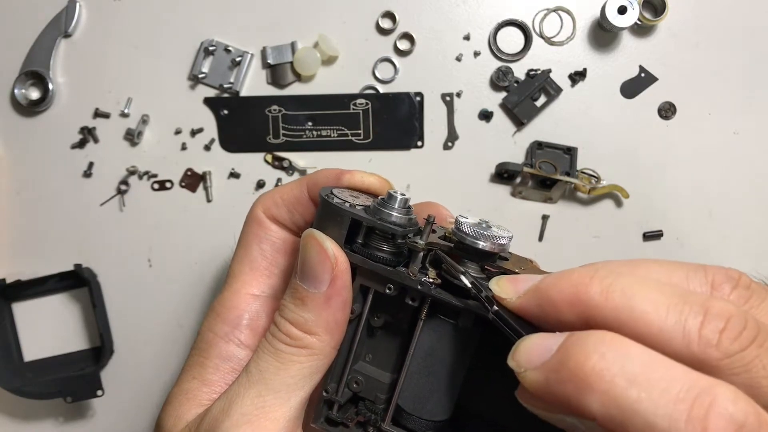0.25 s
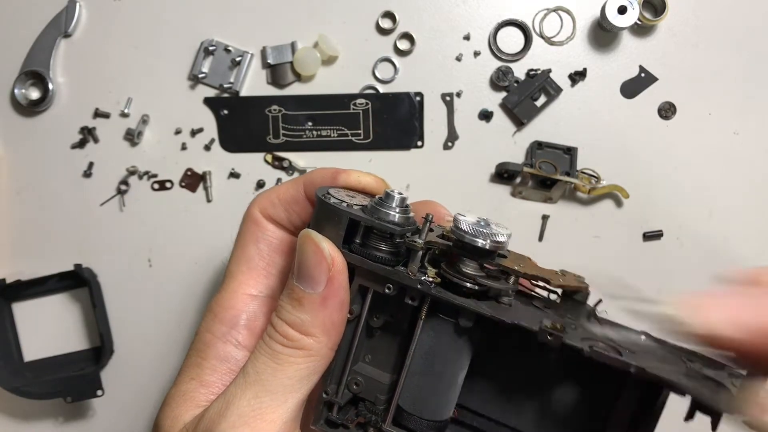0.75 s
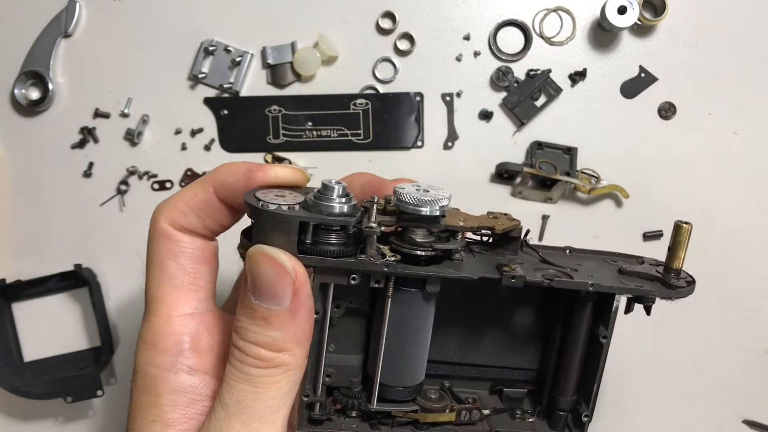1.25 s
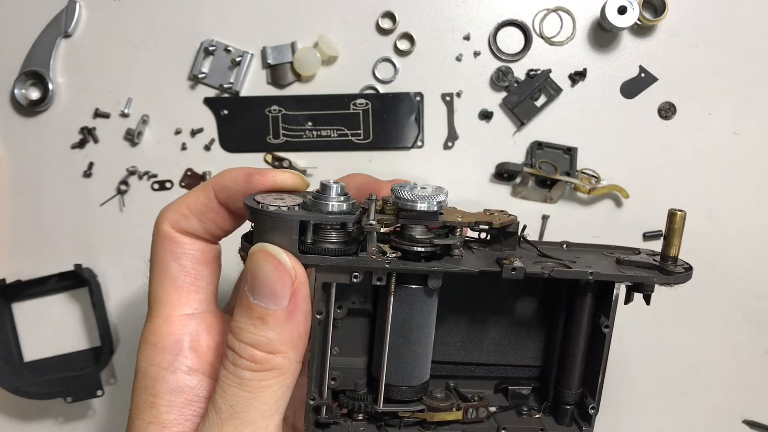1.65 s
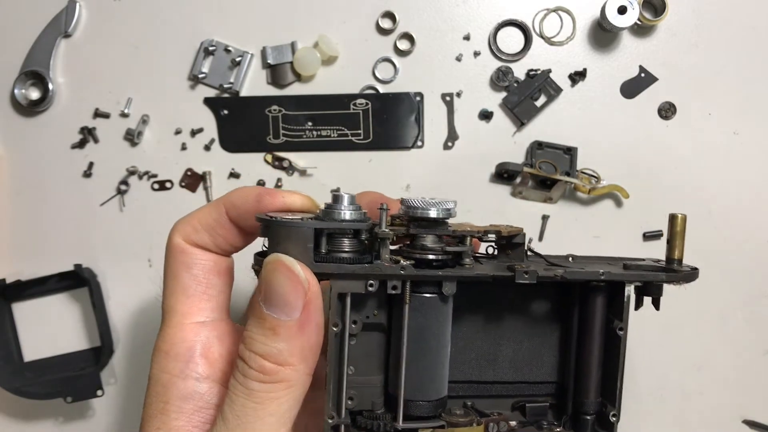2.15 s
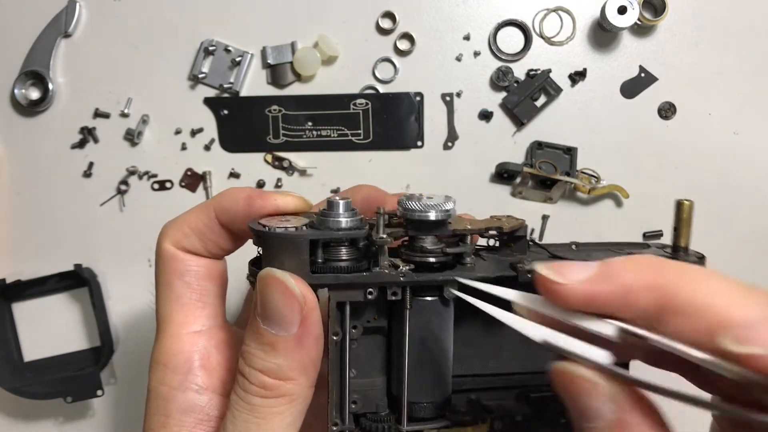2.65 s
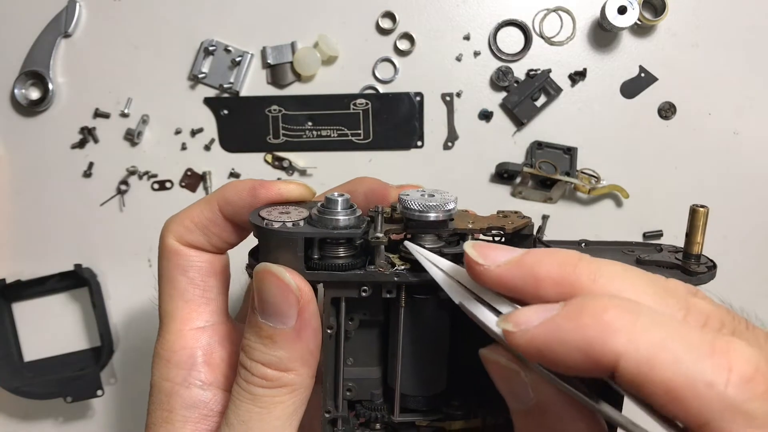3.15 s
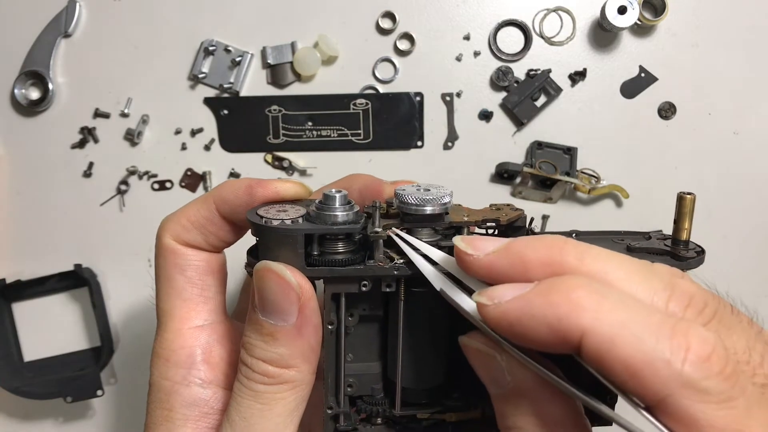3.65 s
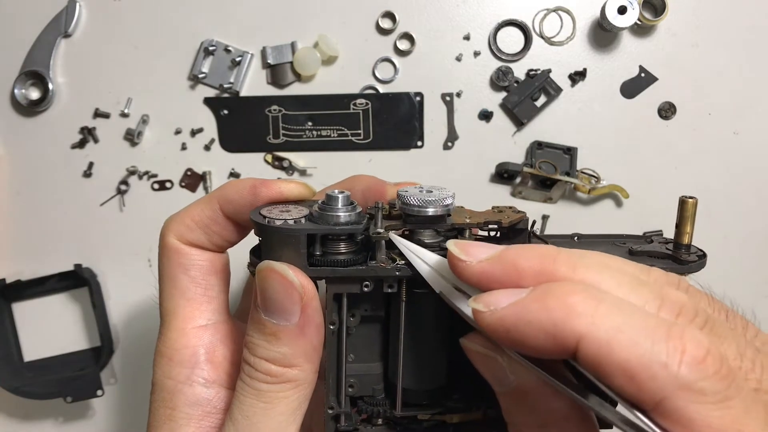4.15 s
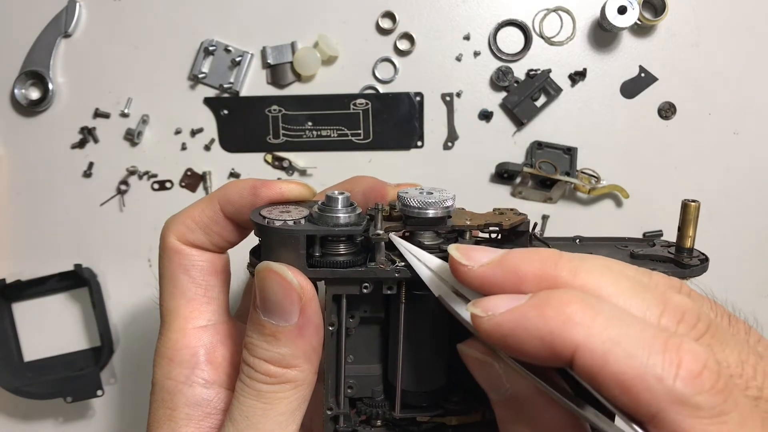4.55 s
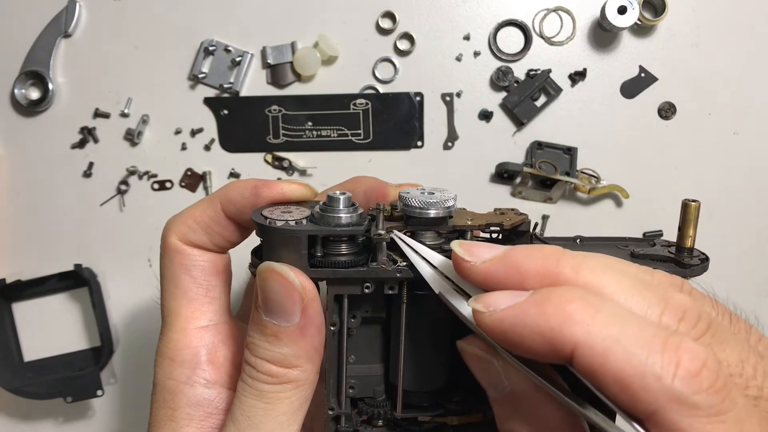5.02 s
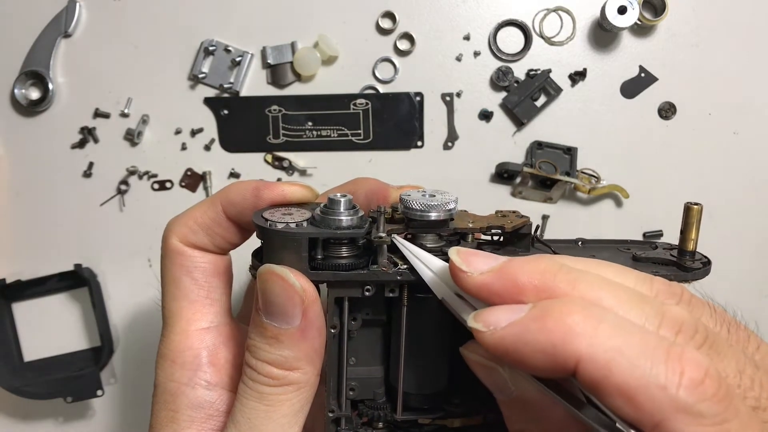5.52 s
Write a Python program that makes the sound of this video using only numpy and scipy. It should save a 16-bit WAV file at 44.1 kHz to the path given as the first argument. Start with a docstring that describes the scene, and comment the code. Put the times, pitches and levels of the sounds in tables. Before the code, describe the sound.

In a quiet room with a soft hiss and low drone, tweezers tick faintly and a fingertip brushes a camera body. The mechanism is turned once by hand: a short slide and dry squeak, a quick ratcheting rattle, then a sharp latch click. Sparse, delicate metal ticks and scrapes from the tweezers follow. The sound is close, with slight room ring.

```python
"""Close work on an opened camera body at a bench, over the soft air and drone of a quiet room.
Steel tweezers tick and scrape on small parts; a fingertip brushes the body. From 1.45 s the
mechanism is turned once by hand: a shaft slides, a dry pivot squeaks, the wheels rub and set springs
singing while the pawl runs over its ratchet, the latch catches, and the mechanism settles with a tick.
The room rings faintly. Another brush follows, then scattered scrapes and ticks, the loudest at 4.4 s."""
import sys
import numpy as np
from scipy import signal
from scipy.fft import rfft, irfft, next_fast_len
from scipy.io import wavfile

SR = 44100
rng = np.random.default_rng(int(sys.argv[2]) if len(sys.argv) > 2 else 0)


def dump(signal):
    """Clip the signal to [-1, 1] and save it as 16-bit WAV at the path in sys.argv[1]."""
    limited = np.clip(np.atleast_2d(signal).T, -1, 1)
    pcm = np.round(limited * 32767).astype(np.int16)
    wavfile.write(sys.argv[1], SR, pcm)


N = 255047
TIME = np.arange(N) / SR


def undb(db):
    """Decibels to gain."""
    return 10 ** (np.asarray(db) / 20)


def unit(x):
    """Scale to rms 1."""
    return x / np.sqrt(np.mean(x ** 2))


def fade(t, t60_s):
    """Exponential decay, 60 dB in t60_s."""
    return np.exp(-np.log(1000) * t / t60_s)


def add(out, start_s, x):
    """Mix x into out at start_s."""
    i = int(start_s * SR)
    out[i:i + len(x)] += x[:N - i]


def treble(hz):
    """Octaves above 2 kHz."""
    return np.log2(np.maximum(hz / 2000, 1))


def colour(x, points, tilt_db_per_oct=0):
    """Minimum-phase filter through (freq_hz, gain_db) points, plus treble tilt."""
    size = next_fast_len(len(x), True)
    bins = np.maximum(np.fft.rfftfreq(size, 1 / SR), 1)
    hz, db = np.transpose(points)
    gain = undb(np.interp(np.log(bins), np.log(hz), db) + tilt_db_per_oct * treble(bins))
    cepstrum = irfft(np.log(gain), size)
    cepstrum[1:size // 2] *= 2
    cepstrum[size // 2 + 1:] = 0
    return irfft(rfft(x, size) * np.exp(rfft(cepstrum)), size)[:len(x)]


def resonate(x, peaks):
    """Steep parallel resonances; white noise of rms 1 leaves each at its level."""
    out = 0
    for hz, width_hz, db in peaks:
        b, a = signal.iirpeak(hz, hz / width_hz, SR)
        band = signal.lfilter(b, a, signal.lfilter(b, a, x))
        out = out + undb(db) * np.sqrt(2 * SR / np.pi / width_hz) * band
    return out


def tone(t, hz, width_hz):
    """Resonance whose phase wanders as the contact shifts."""
    drift = np.cumsum(rng.standard_normal(len(t))) * np.sqrt(2 * np.pi * width_hz / SR)
    return np.sin(2 * np.pi * hz * t + drift)


def swell(t, start_s, level_db, attack_s, hold_s, release_db_per_s, bite_db=11):
    """Stroke level in dB: bites in below its peak, rises, holds, dies away."""
    rise = np.minimum((t - start_s) / attack_s, 1)
    released_s = np.maximum(t - start_s - attack_s - hold_s, 0)
    return level_db - bite_db * (1 - rise) - release_db_per_s * released_s


def strokes(rows):
    """Summed gain of swells, each silent before its start."""
    return sum(undb(swell(TIME, *row)) * (TIME > row[0]) for row in rows)


def friction(rough_db):
    """Dense micro-slips, a few much larger than the rest."""
    return unit(rng.standard_normal(N) * undb(rough_db * np.minimum(rng.exponential(size=N), 5)))


def blows(hits, spectrum, modes, crack_t60_s, rattle_db, rattle_t60_s, rebound, impact_db):
    """Each blow: sharp double contact, dense rattle of small parts, ring of large ones."""
    t, out = TIME[:SR // 3], np.zeros(N)
    contact = (t == 0) + rebound * np.sinc((t - .00041) * SR)
    for start_s, db, tilt in hits:
        grit, parts = rng.standard_normal((2, len(t)))
        crack = .06 * grit * fade(t, crack_t60_s)
        rattle = undb(rattle_db) * parts * fade(t, rattle_t60_s)
        peak = np.abs(colour(contact, spectrum, tilt)).max()
        impact = colour(contact + crack + rattle, spectrum, tilt) / peak
        add(out, start_s, undb(db + impact_db) * impact)
    for hz, mode_db, t60_s in modes:
        energy = np.zeros(N)  # topped up by every blow
        for start_s, db, tilt in hits:
            add(energy, start_s, (undb(db + mode_db + tilt * treble(hz)) * fade(t, t60_s)) ** 2)
        out += np.sqrt(energy) * tone(TIME, hz, width_hz=6)
    return out


# freq_hz, gain_db
AIR_SPECTRUM = [(25, -21.5), (45, -10), (90, -6.5), (200, -5.5), (260, -1.5), (450, -0.5), (750, -0.5),
                (1150, -4.5), (1500, -15), (2200, -17), (4000, -21), (8000, -25.5), (14000, -30),
                (15500, -34)]
# pitch_hz, width_hz, level_db
DRONE_BANDS = [(57, 15, -83), (122, 22, -84.5), (244.2, 13, -85), (322, 50, -80.5)]


def air(hiss_db=-69.5):
    """Soft, steady room noise with a low drone."""
    hiss = undb(hiss_db) * unit(colour(rng.standard_normal(N), AIR_SPECTRUM))
    return hiss + resonate(rng.standard_normal(N), DRONE_BANDS)


# freq_hz, gain_db, t60_s
ROOM_DECAY = [(60, -23, 1.2), (300, -14.5, 1.5), (703.3, -14, 1.2), (1300, -31, 2.1), (2500, -34, 0.94),
              (6000, -28, 0.42), (15000, -32, .75)]


def room(x, build_s=.013):
    """Diffuse reverberation in octave bands; the mids last longest."""
    t = TIME[:3 * SR // 2]
    hz, db, t60_s = np.transpose(ROOM_DECAY)
    response = 0
    for centre_hz in 85 * 2. ** np.arange(8):
        edges_hz = [centre_hz / np.sqrt(2), centre_hz * np.sqrt(2)]
        sos = signal.butter(3, edges_hz, "band", fs=SR, output="sos")
        band = signal.sosfilt(sos, rng.standard_normal(len(t)))
        gain_db, decay_s = (np.interp(np.log(centre_hz), np.log(hz), column) for column in (db, t60_s))
        shape = fade(t, decay_s) * (1 - np.exp(-t / build_s))
        response = response + undb(gain_db) * band * shape / np.linalg.norm(shape)
    return signal.fftconvolve(x, response)[:N]


# freq_hz, gain_db
SKIN_SPECTRUM = [(300, -3), (1500, -0.5), (3500, 0), (4600, -4.5), (6200, -16), (15000, -19)]
# start_s, level_db, attack_s, hold_s, release_db_per_s
BRUSH_STROKES = [(.919, -66.5, .007, .016, 280), (2.17, -68, .007, .012, 280)]


def fingertips():
    """Skin brushes the body."""
    return unit(colour(friction(rough_db=3.5), SKIN_SPECTRUM)) * strokes(BRUSH_STROKES)


# pitch_hz, width_hz, gain_db
BRIGHT_MODES = [(2510, 510, 2), (4050, 370, 1.5), (6430, 240, -3), (9800, 660, -0.5), (12700, 1100, 4),
                (13540, 1000, 4), (15600, 1000, 5)]
PRONG_MODES = [(4340, 99, -8.5), (12900, 200, -6), (13800, 180, -6), (15300, 250, -5)]
# start_s, level_db, attack_s, hold_s, release_db_per_s
SCRAPE_SWELLS = [(.726, -74, .005, .025, 400), (2.377, -69.5, .003, .04, 400),
                 (4.008, -56.5, .011, .024, 500), (4.371, -69, .003, .022, 500)]
PRONG_SWELL = (4.029, -61, .013, .035, 480)


def scrapes(grit_db=-11):
    """Four tweezer drags, the third ringing the prongs; the last, faint, comes just before the loudest tick."""
    bright = unit(resonate(friction(rough_db=3), BRIGHT_MODES))
    grit = undb(grit_db) * friction(rough_db=1)
    prongs = sum(undb(db) * tone(TIME, hz, width_hz) for hz, width_hz, db in PRONG_MODES)
    return (bright + grit) * strokes(SCRAPE_SWELLS) + prongs * strokes([PRONG_SWELL])


# pitch_hz, gain_db
TIP_MODES = [(3740, -1.5), (7480, -12), (8000, -12.5), (15400, -8.5)]
SCREW_MODES = [(2990, 0)]
CATCH_MODES = [(2300, -3), (7200, -2.5), (7790, 0.5)]
STOP_MODES = [(5900, -1), (6170, -4), (8520, -18), (10020, -11.5), (11340, -17), (12430, -17), (13170, -12)]
PIN_MODES = [(3250, -12.5), (3650, -16.5), (4920, -10.5), (6150, -3), (9330, -11), (12100, -4), (12550, -4),
             (13400, -9), (15280, -2)]
LEVER_MODES = [(1810, -1), (1980, -12.5), (2180, 2), (2440, -65.5), (3700, -15), (4200, -19), (4720, -9),
               (4980, -6.5), (8100, -24), (9050, -22), (15400, -8)]
# start_s, level_db, rise_s, tilt_db_per_oct, modes
SMALL_TICKS = [(.269, -88, .0016, 11, TIP_MODES), (.7679, -50, 0.0023, 2.5, TIP_MODES),
               (.781, -64.5, 0.012, 5.5, TIP_MODES), (0.7897, -52.5, 0.0055, 3.5, SCREW_MODES),
               (1.275, -71.5, .0027, 1.5, CATCH_MODES), (1.448, -51, 0.00068, -2.5, CATCH_MODES),
               (1.9708, -45, 0.0014, 1, STOP_MODES), (2.412, -39.5, 0.0017, 0, PIN_MODES),
               (3.314, -77, .0015, 1, TIP_MODES), (4.196, -68.5, 0.0052, 6.5, TIP_MODES),
               (4.3946, -34, 0.0016, -2, LEVER_MODES), (4.599, -44.5, 0.0054, -5, TIP_MODES),
               (4.699, -78, 0.0016, 5.5, TIP_MODES), (5.0115, -67, .001, -2.5, LEVER_MODES)]


def small_ticks(width_ratio=.0057, choke_t60_s=.019, grit_db=-31, after_db=-25, after_t60_s=.11):
    """Metallic ticks from tweezer tips or the mechanism settling: a choked ring, a faint after-ring."""
    t, out = TIME[:SR // 8], np.zeros(N)
    for start_s, level_db, rise_s, tilt, modes in SMALL_TICKS:
        ring = sum(undb(db + tilt * treble(hz)) * tone(t, hz, width_ratio * hz) for hz, db in modes)
        grit = undb(grit_db) * rng.standard_normal(len(t))
        since_peak_s = np.maximum(t - rise_s, 0)
        tick = fade(since_peak_s, choke_t60_s) * (ring + grit)
        after_ring = undb(after_db) * fade(since_peak_s, after_t60_s) * ring
        add(out, start_s, undb(level_db) * np.minimum(t / rise_s, 1) * (tick + after_ring))
    return signal.sosfilt(signal.butter(6, 1500, "high", fs=SR, output="sos"), out)


# start_s, length_s, pitch_hz, level_db
PIVOT_SQUEAKS = [(1.485, 0.1, 2150, -56), (1.564, .02, 2100, -45.5), (1.583, .012, 2040, -46.5),
                 (1.594, .011, 1960, -47.5)]


def pivot():
    """The dry pivot sticks and sings in short, rough swells."""
    out = np.zeros(N)
    for start_s, length_s, hz, db in PIVOT_SQUEAKS:
        t = TIME[:int(length_s * SR)]
        add(out, start_s, undb(db) * np.sin(np.pi * t / length_s) * tone(t, hz, width_hz=60))
    return out


# pitch_hz, width_hz, gain_db
SHAFT_MODES = [(1117.7, 630, -21.5), (2150, 90, -16.5), (3100, 300, -13), (5367, 140, -11.5)]
# start_s, level_db, attack_s, hold_s, release_db_per_s
SLIDE_STROKES = [(1.4555, -45, .011, .03, 330), (1.585, -68, .012, .02, 330)]


def shaft():
    """Sliding friction rings the shaft."""
    return resonate(friction(rough_db=-1.5) * strokes(SLIDE_STROKES), SHAFT_MODES)


# freq_hz, gain_db
WHEEL_SPECTRUM = [(350, -44.5), (600, -15.5), (660, -31.5), (726, -15.5), (1150, -6), (1620, -18.5),
                  (1960, -3.5), (2440, 2), (2750, -12.5), (3110, -3.5), (4620, -11.5), (5360, -7),
                  (9500, -16.5), (13700, -15.5), (15500, -15.5)]
# start_s, level_db, attack_s, hold_s, release_db_per_s
TURN_STROKE = (1.620, -36, .012, .038, 270)


def wheels():
    """The wheels rub during the slides and the turn."""
    rubbing = unit(colour(friction(rough_db=5.5), WHEEL_SPECTRUM))
    return rubbing * strokes([*SLIDE_STROKES, TURN_STROKE])


# pitch_hz, width_hz, gain_db
SPRING_MODES = [(10000, 50, -10.5), (11950, 24, -9.5), (15558, 13, -7.5)]


def springs():
    """Small springs sing at the fastest part of the turn."""
    turn = strokes([TURN_STROKE])
    ring = sum(undb(db) * tone(TIME, hz, width_hz) for hz, width_hz, db in SPRING_MODES)
    return turn ** 2 / turn.max() * ring


# start_s, level_db, tilt_db_per_oct
LATCH_HITS = [(1.8295, -39, -3), (1.8396, -41, 1), (1.852, -43, -3), (1.8578, -22.5, 1), (1.867, -26, 1.5),
              (1.8864, -42, -3), (1.9085, -43, -3), (1.9215, -43, -3), (2.028, -57, -5)]
# freq_hz, gain_db
LATCH_SPECTRUM = [(40, -29.5), (170, -7.5), (260, 1), (850, 0), (1280, 7.5), (1560, -8), (1800, 6.5),
                  (2500, 1), (3200, -10), (5800, -18.5), (8000, -26), (15500, -39)]
# pitch_hz, gain_db, t60_s
LATCH_MODES = [(248, -27.5, 0.09), (1280, -20, 0.051), (5820, -17, 0.023), (9010, -28, 0.038),
               (10500, -29, 0.017), (11250, -37, 0.11), (12040, -30, 0.046), (15100, -33, 0.035),
               (15650, -39, .035)]


def latch(bounce_s=.0025, bounce_loss_db=7.5):
    """The latch touches, catches and settles; each blow bounces twice, unevenly and weaker."""
    hits = [(start_s + k * bounce_s * rng.uniform(.518, 1.7), db - k * bounce_loss_db, tilt)
            for start_s, db, tilt in LATCH_HITS for k in range(3)]
    return blows(hits, LATCH_SPECTRUM, LATCH_MODES, crack_t60_s=.0079,
                 rattle_db=-14.5, rattle_t60_s=.058, rebound=.45, impact_db=-3)


# start_s, level_db
TOOTH_DROPS = [(1.6438, -16.5), (1.6492, -14), (1.6559, -18), (1.6661, -6.5), (1.6782, -10),
               (1.6941, -12.5), (1.7029, -14), (1.7133, -14), (1.7248, -17), (1.7359, -24), (1.7407, -17.5)]
# freq_hz, gain_db
PAWL_SPECTRUM = [(40, -35), (190, -26), (260, -18), (500, -12), (1150, 1.5), (1520, -6.5), (2100, 2),
                 (3000, -0.5), (3700, -7), (4700, -8.5), (5900, -21.5), (8000, -11.5), (9500, -23),
                 (12500, -30), (15500, -24.5)]
# pitch_hz, gain_db, t60_s
FRAME_MODES = [(1131, -35, .15), (1316, -40, 0.28), (1723, -50, .2), (1902, -34, .1), (1950, -30, 0.072),
               (2182, -32.5, 0.17), (2520, -34, 0.081), (2645, -42.5, 0.47), (3140, -37.5, .13),
               (3090, -34.5, .13), (3156, -39, 0.13), (3345, -38, 0.16), (4170, -38, 0.17),
               (4690, -45, .13), (4880, -39, .12), (7470, -38, 0.25), (8140, -44, .08)]
# start_s, level_db, attack_s, hold_s, release_db_per_s
CHATTER_SWELL = (1.618, -25.5, .03, .085, 190)


def ratchet(chatter_count=26, chatter_per_s=165, scatter_db=5, tilt_db_per_oct=1, tilt_fall_per_s=18.5):
    """The loose pawl drops off each tooth and chatters between, ever duller, ringing the frame."""
    onset_s = CHATTER_SWELL[0]
    jitter, strength = rng.random((chatter_count, 2)).T
    chatter_s = onset_s + (np.arange(chatter_count) + jitter) / chatter_per_s
    chatter_db = swell(chatter_s, *CHATTER_SWELL) + scatter_db * (2 * strength - 1)
    hits = [(start_s, db, tilt_db_per_oct - tilt_fall_per_s * (start_s - onset_s))
            for start_s, db in [*TOOTH_DROPS, *zip(chatter_s, chatter_db)]]
    return blows(hits, PAWL_SPECTRUM, FRAME_MODES, crack_t60_s=.005,
                 rattle_db=-25, rattle_t60_s=.09, rebound=.59, impact_db=-.5)


def scene():
    """Close bench work with the room far behind it, mono."""
    mechanism = wheels() + shaft() + springs() + ratchet() + latch() + pivot()
    work = mechanism + small_ticks() + scrapes() + fingertips()
    return (work + room(work) + air())[None]


def record(dry, cutoff_hz=15850):
    """Steep low-pass."""
    return signal.sosfilt(signal.ellip(10, .2, 70, cutoff_hz, fs=SR, output="sos"), dry)


dry = scene()
out = record(dry)
dump(out)
```